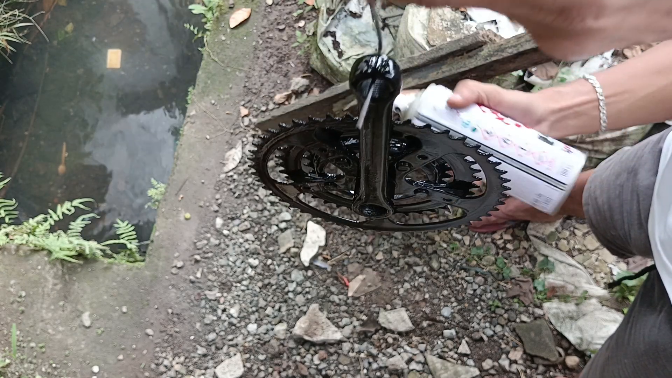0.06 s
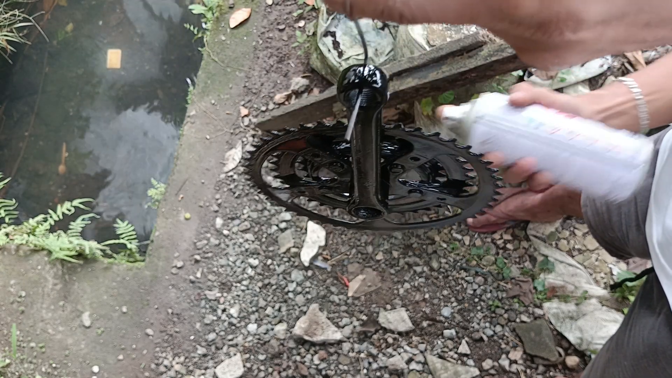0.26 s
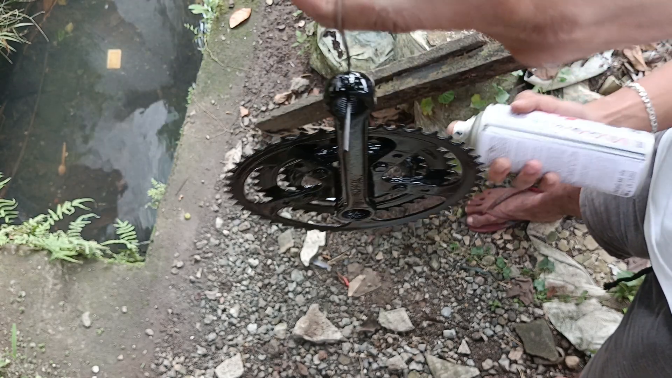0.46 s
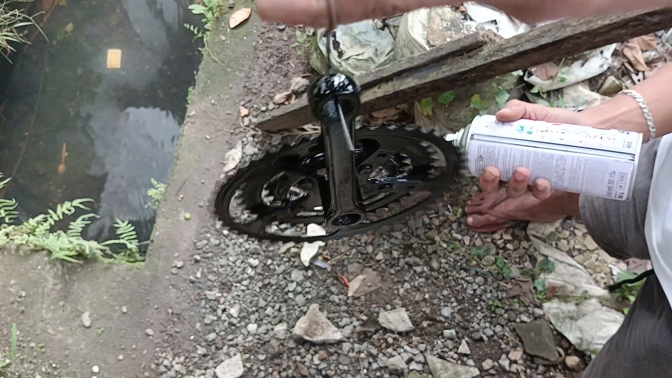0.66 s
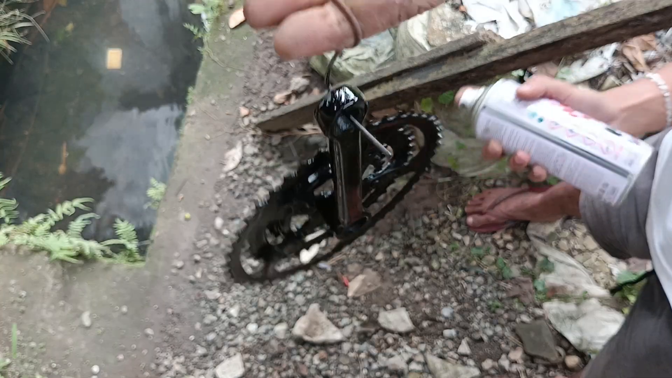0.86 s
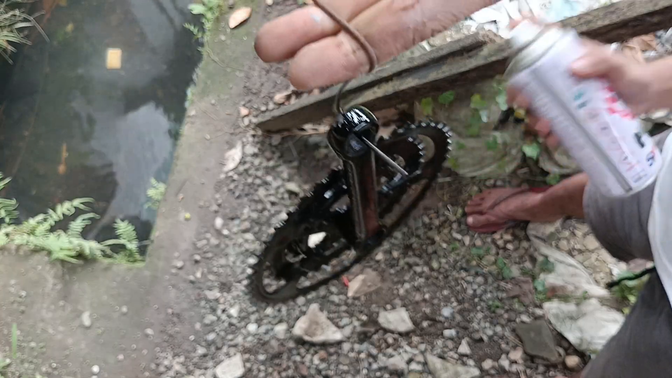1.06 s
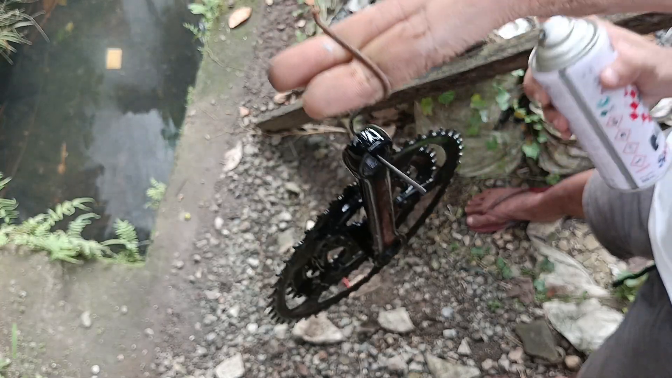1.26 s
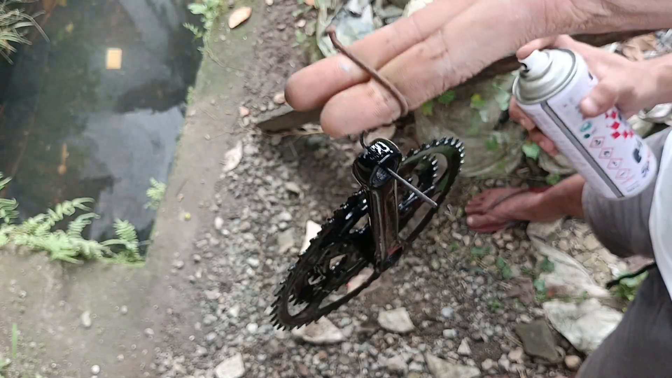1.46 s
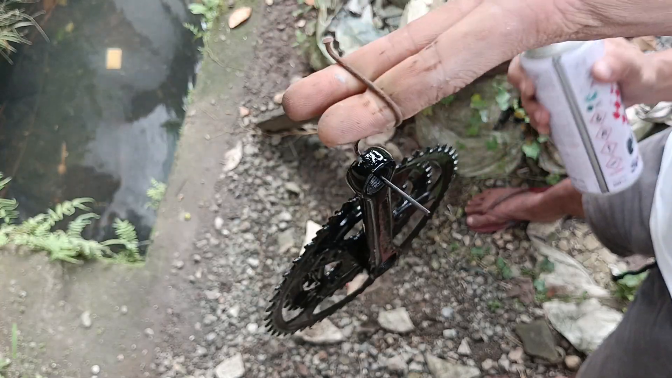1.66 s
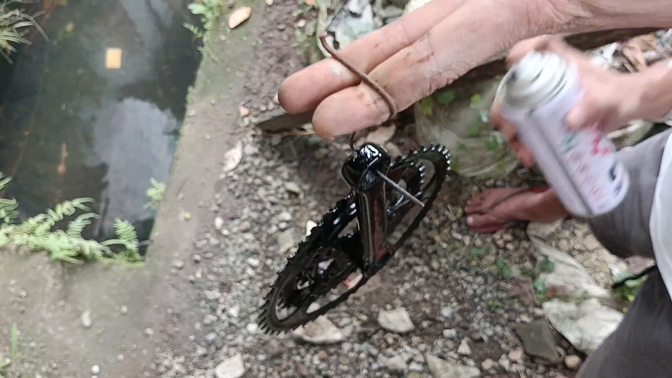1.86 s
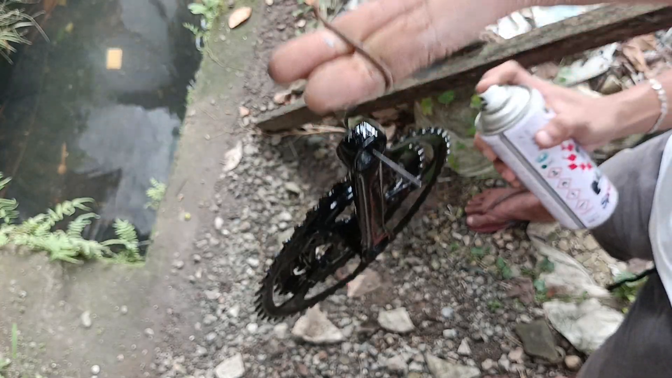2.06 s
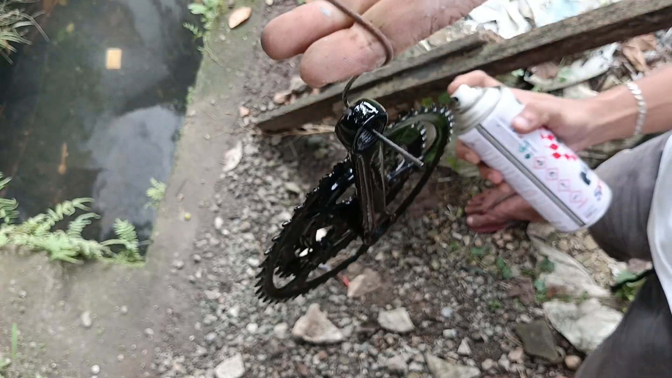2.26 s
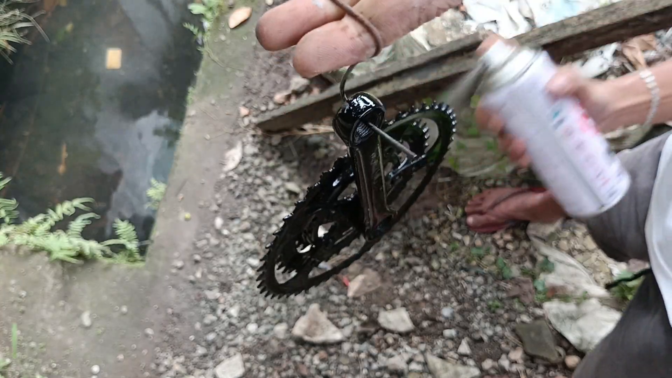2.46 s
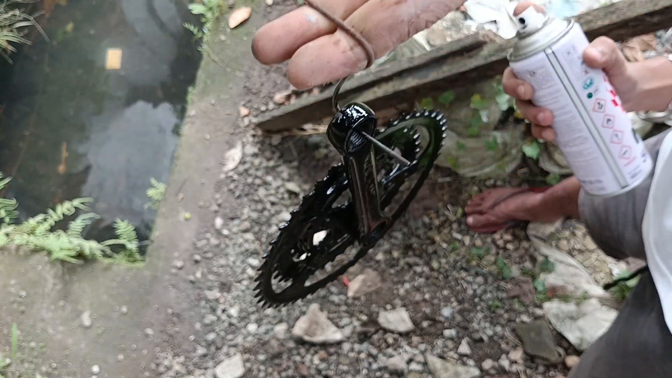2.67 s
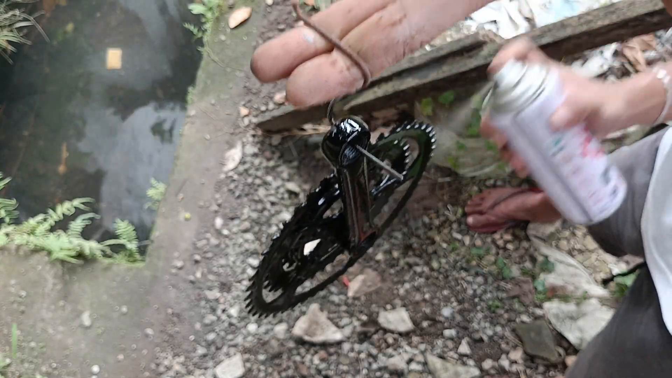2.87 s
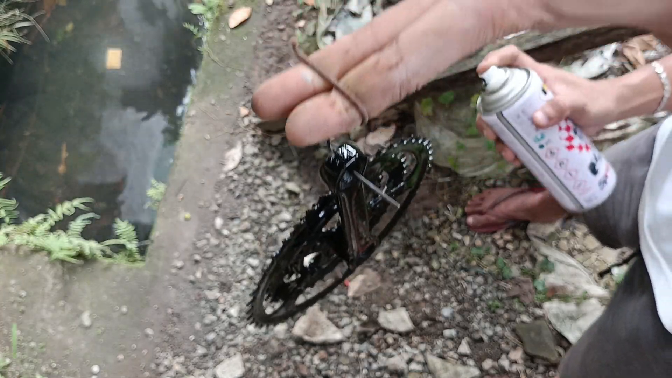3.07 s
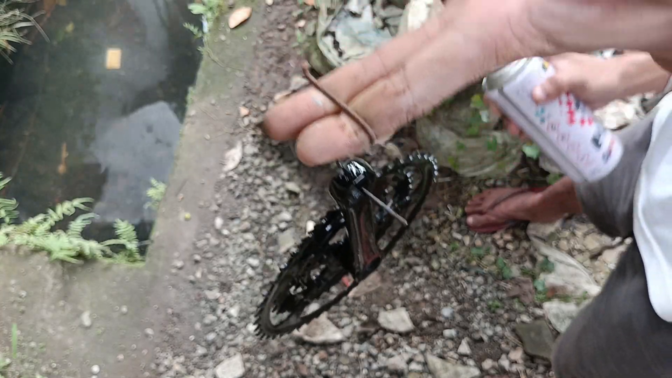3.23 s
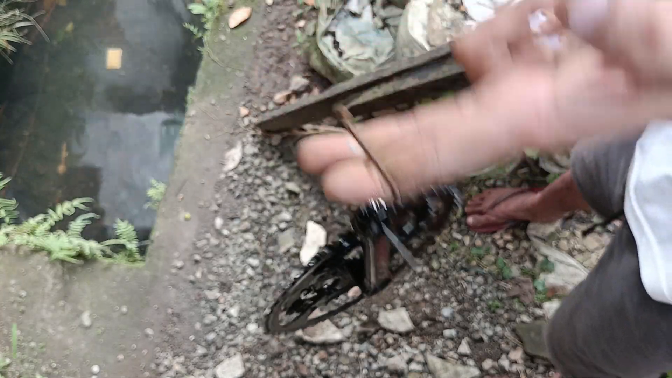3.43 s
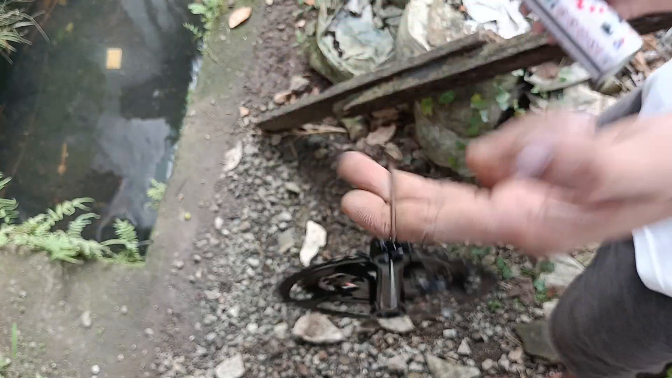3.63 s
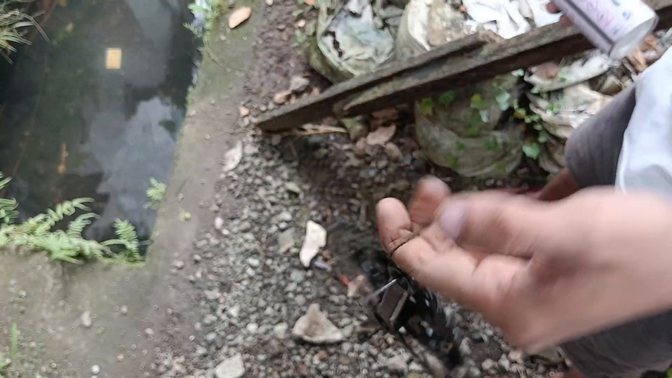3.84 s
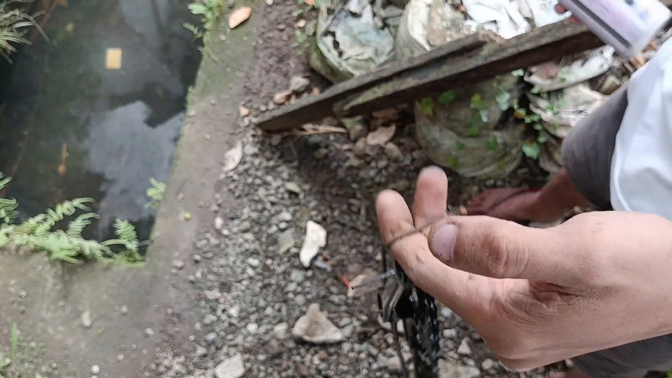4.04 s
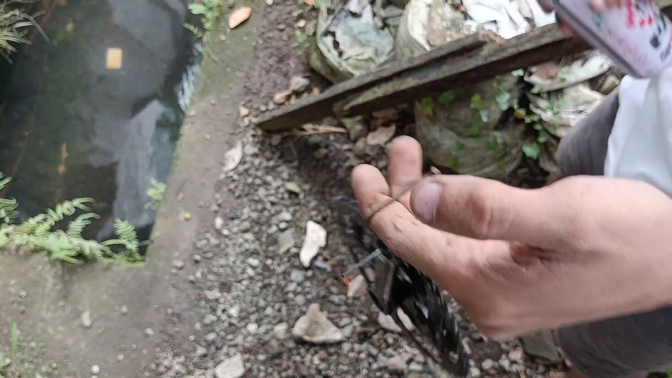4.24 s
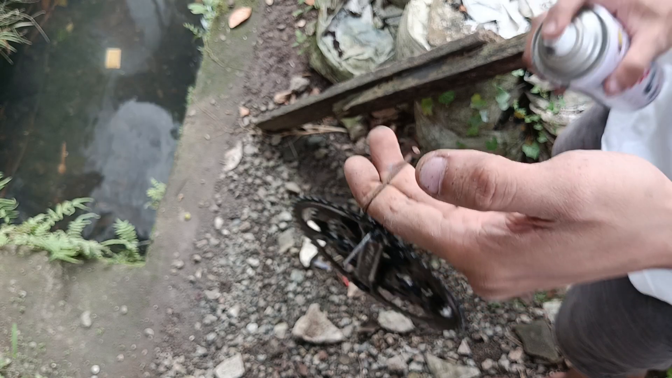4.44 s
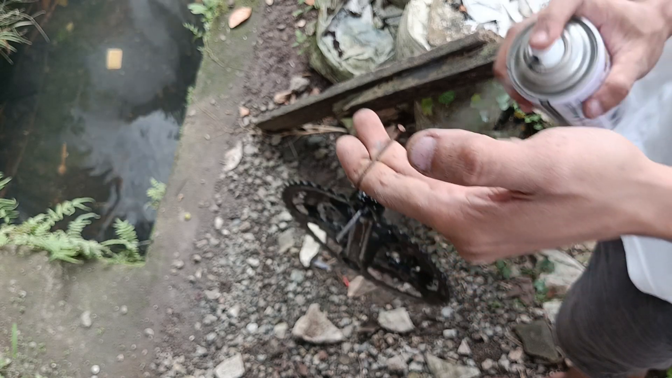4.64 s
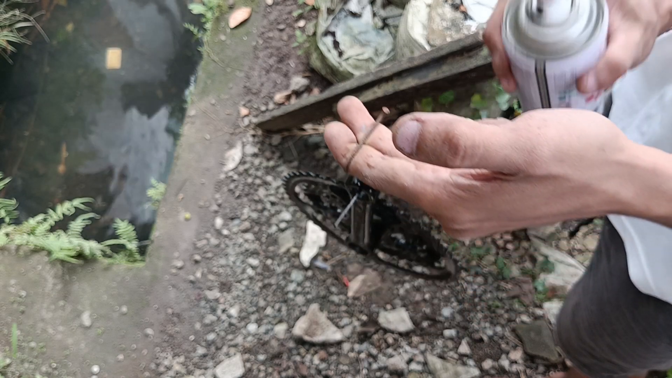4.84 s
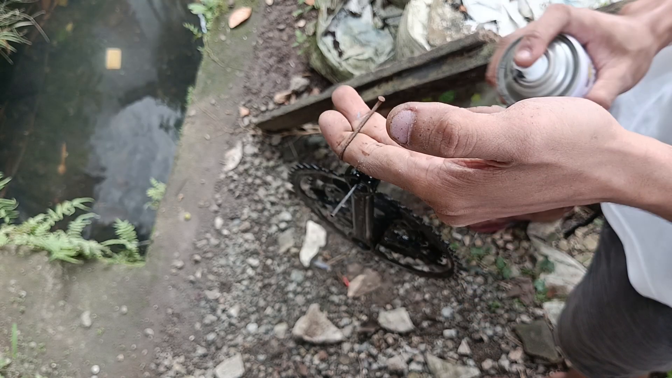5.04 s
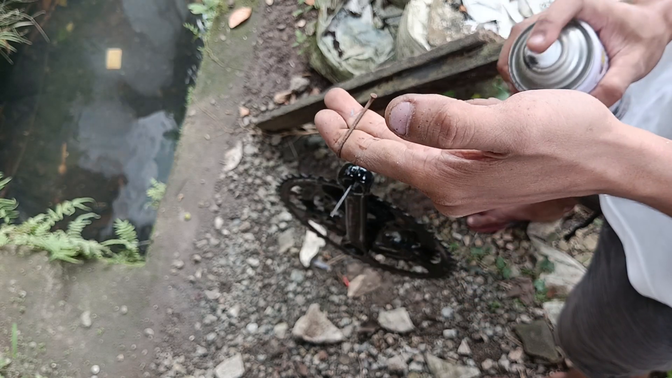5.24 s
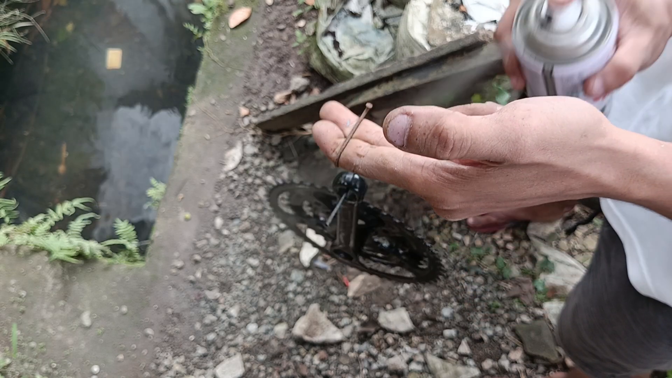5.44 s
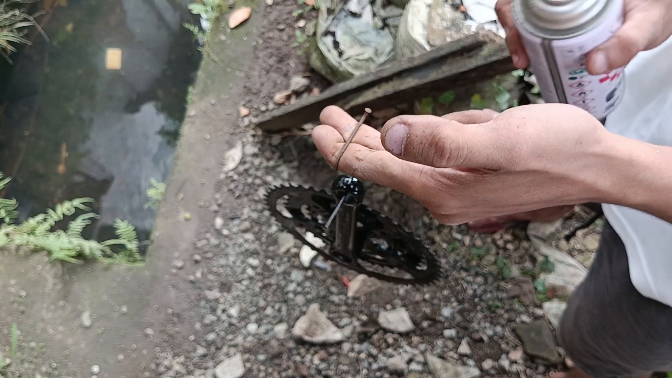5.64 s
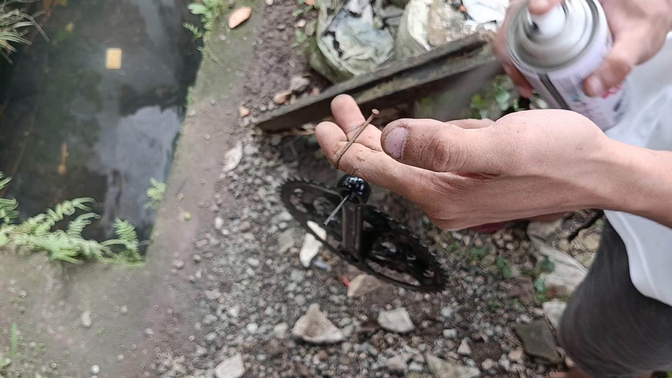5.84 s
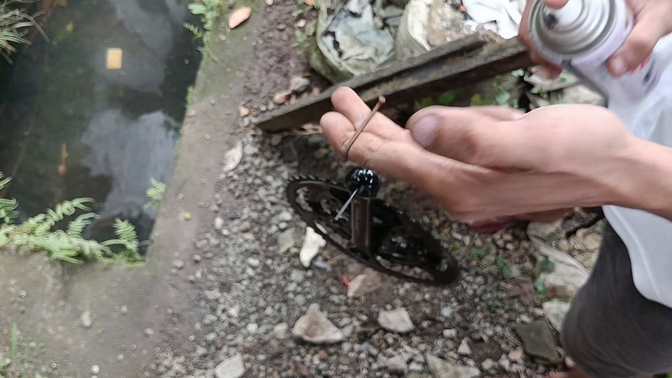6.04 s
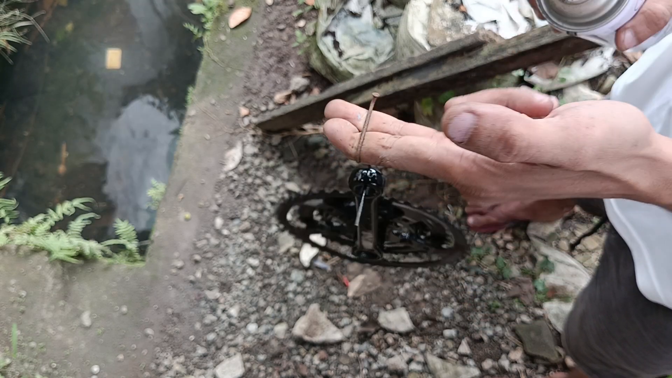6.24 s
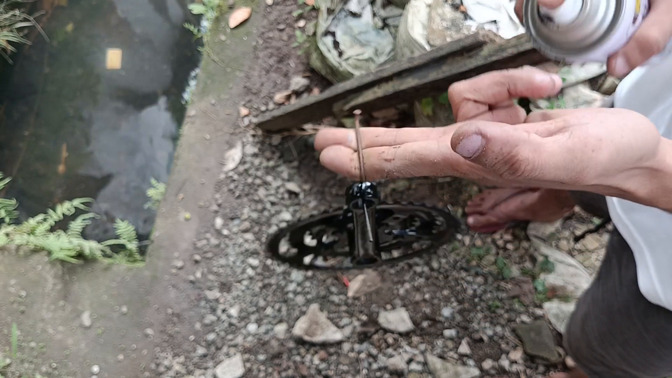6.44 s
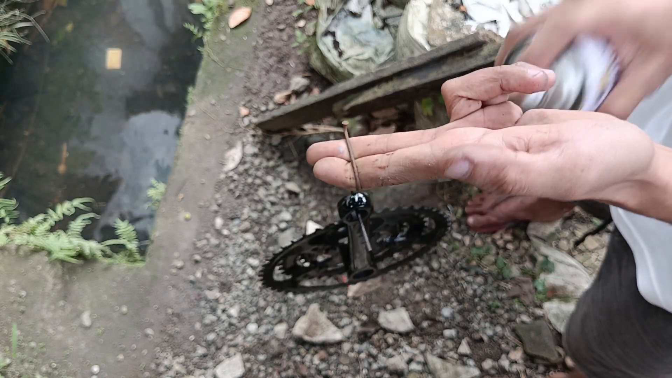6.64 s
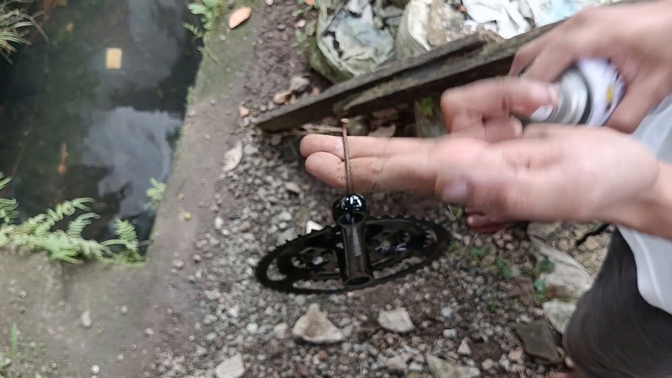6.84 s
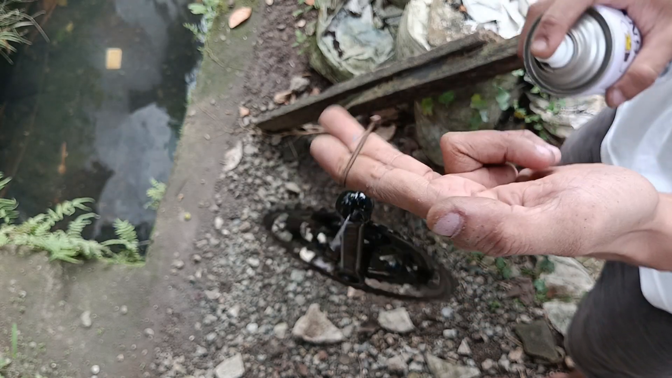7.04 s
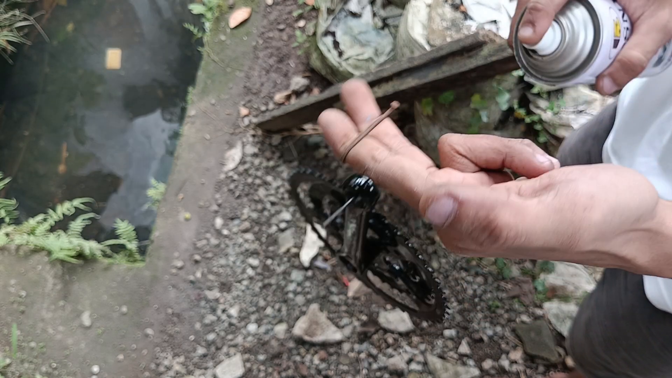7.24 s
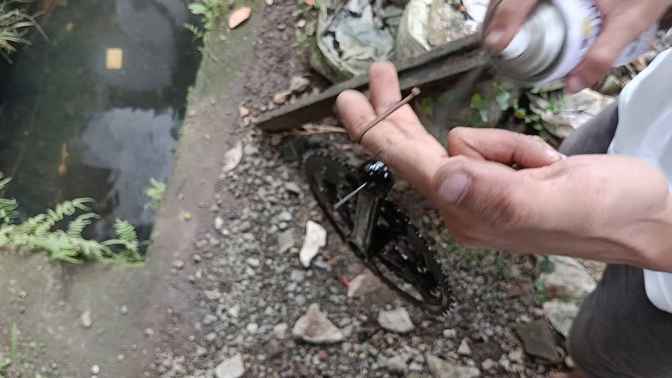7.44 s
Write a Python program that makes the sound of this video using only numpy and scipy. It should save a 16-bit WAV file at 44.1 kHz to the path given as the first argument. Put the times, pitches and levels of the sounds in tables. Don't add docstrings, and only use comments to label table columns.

```python
import sys
import numpy as np
from scipy import signal
from scipy.fft import rfft, irfft
from scipy.io import wavfile
from scipy.ndimage import uniform_filter1d, map_coordinates

SR = 44100
rng = np.random.default_rng(int(sys.argv[2]) if len(sys.argv) > 2 else 0)


def nominal_scale(level):
    x = np.asarray(level, float) / 20
    return 10 ** x


def int16_out(signal):
    q = np.round(np.clip(np.atleast_2d(signal).T, -1, 1) * 32767)
    wavfile.write(sys.argv[1], SR, q.astype(np.int16))


N = 330750
T = np.arange(N) / SR

# [start t/s, length t/s, fine hiss at full flow level/dB,
# full flow at share of length, slowness of the finger]
PRESSES = [(-.09, 0.15, -47, 0.64, 2.1), (0.189, 0.22, -33, 0.85, 1.09), (1.532, 0.23, -34, 0.47, 1.27),
           (1.913, 0.21, -34, 0.78, 1), (2.398, 0.25, -32, 0.47, 1.02), (2.91, 0.23, -32, 0.44, 1.26),
           (3.277, 0.17, -73, 0.099, 1.3), (4.617, 0.22, -32.5, 0.83, 1.16),
           (4.951, 0.26, -33.5, 0.33, 1.11), (5.349, 0.28, -31, 0.49, 1.19), (5.816, 0.22, -31, 0.51, 1.04),
           (6.304, 0.29, -57, 0.11, 2.18), (6.687, 0.24, -36.5, 0.84, 1.2)]
# [low roar at start, at end level/dB re jet, hand echo lag at start, at end t/ms]
NOZZLE_AIM = [(-29, 7, 0.65, 0.92), (-13, -18, 0.89, 0.426), (-17, -7, 0.91, 0.775),
              (-9.5, -18.5, 0.83, 0.83), (-13.5, -15.5, 0.59, 0.73), (-10.5, -17.5, 0.84, 0.78),
              (23.5, 8, 1, 0.86), (-13.5, -9.5, 0.863, 0.71), (-9, -12, 0.904, 0.69),
              (-18.5, -6, 0.72, 0.837), (-14.5, -13, 0.912, 0.7), (17.5, 8.5, 0.95, 0.915),
              (-8, -5.5, 0.897, 0.796)]
WHISTLE_HZ = [2700, 2092, 2700, 2700, 2700, 2689, 2250, 2600, 2600, 2514, 2520, 1893, 1950]
# [f/Hz, level/dB per Hz]
JET_COLOUR = [(290, -60), (500, 8), (799, -21), (872, 10), (1290, -1), (2220, -9), (2540, -4), (3210, -9.5),
              (5120, -1), (11600, -0.5), (15100, 6), (15800, -10), (16900, -27)]
# [t/s, peak level/dB, loudest ring f/Hz, hollow knock level/dB re peak, bright tick level/dB re peak]
FIRST_TILT = [(0.6694, -67, 3680, -4, 0), (0.848, -12.5, 6130, -8, -13.5), (.8495, -15.5, 2930, -19, -42),
              (0.8743, -9, 6100, -15, -11), (0.9, -12.5, 2800, -2.5, -19), (0.9427, -41, 3240, -12, -28),
              (0.9542, -15, 4760, -23, -37), (0.9667, -10, 4700, -12, -24), (0.9819, -21.5, 4430, -7, -25),
              (1.013, -23, 3040, -2, -19), (1.0156, -11, 5180, -26, -13), (1.0428, -28, 5170, 10, -41),
              (1.0979, -31.5, 3100, 0, -21), (1.1058, -27, 6200, -8, -10), (1.1238, -43, 2680, 16, -31),
              (1.149, -52, 4530, 11, -12)]
SECOND_TILT = [(1.3161, -8, 4370, -2.5, -10), (1.3221, -0.5, 6100, -16, -9),
               (1.3232, -13, 4480, -16.5, -14), (1.3255, -11.5, 2870, -5.5, -12),
               (1.331, -20, 6800, -8, -6), (1.3396, -32, 6600, 5, -25), (1.355, -31, 5960, 1, -10),
               (1.379, -48, 2840, 18, -8), (1.3967, -46, 7010, 3, -14), (1.436, -26.5, 3400, 12, -16),
               (1.4972, -32, 4470, 6, -35), (1.502, -15.5, 6540, 3, -11), (1.5249, -24, 4600, -15, -25),
               (1.5403, -28, 4600, 12, -21), (1.5636, -26, 2950, 4, -20), (1.581, -20, 3000, -1, -7),
               (1.5835, -20.5, 4530, -2.5, -8), (1.595, -27, 2700, 1.5, -16), (1.612, -31, 4750, -7, -20),
               (1.6322, -26, 5500, 4, -21), (1.643, -27, 6050, 11, -13), (1.69, -28, 2640, 5, -5),
               (1.713, -37, 2620, 10, -5), (1.762, -30.5, 4770, -4, -23)]
THIRD_TILT = [(4.4143, -22, 2820, -2, -13.5), (4.419, -28, 6740, 1, -12.5), (4.4595, -4.5, 7970, -24, -4),
              (4.4614, -20, 7900, -4, -9), (4.4725, -16.5, 2600, -2, -28), (4.4730, -12.5, 6760, -15.5, -3),
              (4.485, -26, 5500, -20, -2), (4.5174, -27, 5870, 15, -5.5), (4.5675, -12.5, 6040, -1, -5),
              (4.584, -28.5, 5140, 7, -31), (4.6424, -18.5, 2600, -0.5, -9.5),
              (4.655, -39, 6030, 16.5, -18), (4.679, -16, 2600, -1, -12), (4.685, -17.5, 2270, -6.5, -11),
              (4.7351, -18, 6700, -6, -3), (4.7466, -29.5, 2600, 5, -14), (4.7522, -16, 5200, -10, -6.5),
              (4.7635, -34, 4500, -4, -7), (4.7991, -29.5, 5200, -16, -3.5), (4.8094, -24, 5200, 7.5, -22),
              (4.821, -36, 5200, -9.5, -10.5), (4.837, -44.5, 6050, 7.5, -8),
              (4.8636, -19.5, 2560, -19, -19), (4.887, -41, 2660, -3, -23.5), (4.903, -36.5, 3700, 4, -13),
              (4.919, -46, 2440, -2, -27), (4.9512, -42.5, 4984, 8.5, -16), (4.9584, -28, 6130, -5.5, -33)]
KNOCKS = FIRST_TILT + SECOND_TILT + THIRD_TILT
SHELL_HZ = np.array([1250, 1450, 1650, 1850, 2250, 2700, 3150, 3700, 4500, 4800, 5800, 6400, 6800, 7800, 8300, 9300, 10300, 10800, 12600, 13600, 14800])[:, None]
HOLLOW_HZ = (1762, 1580, 1280)
# [t/s, peak level/dB]
SLIPS = [(3.101, -49), (3.136, -48), (3.14, -55), (3.145, -47), (3.151, -43), (3.158, -48), (3.167, -48),
         (3.1705, -57), (3.1752, -38), (3.187, -44), (3.192, -54), (3.204, -57), (3.213, -57), (3.221, -62),
         (4.352, -56), (4.367, -52)]
# [f/Hz, level/dB]
YARD_COLOUR = [(600, -25), (1200, -1.5), (2500, 5), (6000, -0.5), (10000, -1), (16000, -5)]
# [start t/s, length t/s, f/Hz, width f/Hz,
# level/dB]
PUFFS = [(0, .2, 230, 60, -61), (.103, .11, 520, 170, -63), (.11, .24, 387, 175, -59),
         (.3, .2, 478, 124, -65), (.72, .08, 590, 150, -67), (1.317, .04, 590, 240, -59),
         (1.495, .02, 600, 280, -55), (1.53, .2, 630, 200, -58), (1.9, .15, 2400, 3700, -53),
         (2.06, .08, 520, 140, -66), (2.2, .09, 607, 130, -69), (2.564, .068, 540, 520, -56),
         (2.963, .084, 640, 480, -60), (3.165, .02, 1100, 300, -61), (3.345, .045, 580, 240, -66),
         (3.45, .005, 1250, 400, -62), (4.085, .05, 2050, 300, -62), (4.12, .06, 1850, 400, -61),
         (4.335, .025, 4060, 800, -62), (4.415, .09, 880, 260, -57), (4.5, .22, 600, 300, -64),
         (5, .08, 2210, 1300, -60), (5.55, .07, 525, 270, -60), (5.97, .09, 560, 220, -62),
         (6.248, .015, 1890, 330, -55), (6.255, .065, 3600, 5000, -60), (6.41, .07, 800, 260, -62),
         (6.63, .065, 960, 230, -69), (6.822, .07, 483, 310, -54), (6.88, .44, 410, 145, -59),
         (7.1, .2, 230, 60, -61), (7.212, .21, 605, 140, -70), (7.44, .05, 600, 200, -64),
         (7.44, .05, 2600, 1500, -70)]
# [start t/s, length t/s, f/Hz, level/dB]
STREAKS = [(.031, .23, 1213, -59), (.4, .14, 2184, -71), (.43, .077, 1650, -66), (.52, .069, 1430, -63),
           (.548, .4, 2100, -67), (.568, .07, 3400, -71), (.693, .15, 1270, -69), (1.17, .05, 1140, -66),
           (1.434, .01, 882, -62), (1.72, .46, 690, -64), (2.28, .079, 1250, -65), (2.53, .056, 665, -56),
           (2.68, .11, 4100, -78), (3.199, .23, 2100, -68), (3.235, .15, 880, -65), (3.26, .037, 3350, -73),
           (3.402, .004, 4750, -68), (3.4, .07, 1250, -68), (3.43, .11, 3200, -77), (3.47, .12, 2150, -71),
           (3.545, .17, 890, -64), (3.585, .21, 1286, -65), (3.667, .082, 4000, -80), (3.7, .11, 2204, -73),
           (4.04, .2, 1400, -72), (4.325, .03, 1143, -64), (4.31, .05, 3840, -66), (5.24, .096, 1400, -66),
           (5.488, .29, 902, -63), (5.618, .29, 2000, -73), (5.634, .32, 1300, -69),
           (5.643, .39, 1570, -68), (5.66, .15, 3700, -77), (5.76, .1, 2300, -65), (5.9, .1, 950, -64),
           (6.06, .07, 1260, -64), (6.065, .08, 3830, -74), (6.14, .09, 920, -60), (6.143, .06, 3100, -76),
           (6.255, .09, 1250, -65), (6.362, .03, 620, -58), (6.526, .13, 3750, -70), (6.56, .11, 3500, -70),
           (6.647, .036, 4400, -72), (6.94, .28, 1250, -68), (7.1, .15, 1238, -68), (7.2, .082, 2500, -73),
           (7.378, .079, 1300, -67)]
# [start t/s, length t/s, rustle level/dB, dry crackle level/dB]
MOVES = [(0, 0.15, -71, -71), (0.17, 0.26, -63.5, -66), (0.602, 0.7, -70.5, -75.5),
         (1.776, 0.25, -58.5, -73), (2.096, 0.045, -52.5, -62), (2.666, 0.15, -75, -77),
         (3.105, 0.075, -67, -76), (3.4, 0.05, -75, -83), (3.656, 0.045, -79.5, -90),
         (3.783, 0.19, -78, -95), (4.059, .07, -77.5, -76.5), (4.338, 0.12, -71, -75),
         (5.663, 0.17, -85, -97), (6.29, 0.08, -62, -72), (6.55, 0.058, -73, -94), (6.946, 0.08, -71, -76),
         (7.143, 0.49, -82, -99.5)]
# [t/s, level/dB]
LEAVES_LEVEL = [(0, -60), (.55, -64), (1.26, -64), (2.23, -55), (2.36, -77), (2.77, -62), (2.88, -65),
                (3.44, -63.5), (3.55, -68.5), (3.68, -61), (3.99, -79.5), (4.13, -66), (4.27, -74.5),
                (5.7, -68.5), (6.15, -66.5), (6.97, -66), (7.2, -73), (7.5, -66.5)]
# [f/Hz, level/dB per Hz]
INSECT_COLOUR = [(3530, -51), (6000, -28.5), (6550, -24.5), (6680, -7.5), (7370, -3), (9110, 1),
                 (9910, -9.5), (12000, -17), (15600, -48.5), (22000, -120)]
# [t/s, level/dB]
TRAFFIC = [(0, -45), (.6, -47), (1.0, -45.5), (1.8, -52), (2.03, -54), (2.14, -51.5), (3.4, -48),
           (4.3, -52), (4.7, -56.5), (5.6, -48.5), (7.5, -47.5)]
# [f/Hz, level/dB per Hz]
RUMBLE_COLOUR = [(15, -49), (25, -21.5), (38, -35.5), (64, -12.5), (86, -9.5), (112, 1.5), (140, 0),
                 (164, -3.5), (236, -23.5), (260, -30.5), (340, -57.5), (570, -120)]
# [start t/s, length t/s, level/dB]
ENGINE_ON = [(0.195, 0.038, -54.5), (0.304, 0.044, -54), (0.41, 0.098, -47), (0.6, 0.3, -51.5),
             (1.205, 0.1, -49.5), (1.373, 0.06, -52.5), (1.682, 0.058, -50.5), (1.86, 0.066, -50),
             (2.1, 0.06, -55), (2.392, 0.12, -51.5), (2.871, 0.172, -48), (3.192, 0.062, -49),
             (3.331, 0.054, -49.5), (3.564, 0.22, -47.5), (4.127, 0.099, -45), (4.322, 0.13, -50.5),
             (4.633, 0.038, -51.5), (4.784, 0.24, -53), (5.281, 0.076, -49.5), (5.425, 0.106, -48),
             (5.6, 0.15, -48.5), (6.06, 0.16, -50.5), (6.472, 0.28, -49.5), (7.05, 0.099, -55),
             (7.365, 0.12, -52)]
# [start t/s, length t/s, level/dB]
DRONE_ON = [(0, 0.3, -51.5), (0.407, 1.06, -56.5), (1.574, 0.15, -54.5), (1.974, 0.13, -60),
            (2.292, 0.056, -60), (2.605, 0.64, -58), (4.379, 0.091, -59), (4.794, 0.026, -56.5),
            (5.14, 0.49, -60.5), (5.969, 0.034, -58), (6.094, 0.02, -57.5), (6.256, 0.026, -60),
            (6.345, 0.26, -59.5), (6.75, 1, -52.5)]
# [f/Hz, level/dB per Hz]
DRONE_COLOUR = [(240, -22.5), (290, -5.5), (319, 2.5), (350, -3.5), (390, -11), (450, -26), (520, -25.5)]

WHISTLE_WIDTH_HZ, WHISTLE_DB = 200, 6.5
WEAK_HUSH = 2.5
MID_DB, MID_FOLLOWS_ROAR = -1, 0.28
HAND_ECHO = 0.33
CRACK_S, OPEN_S, EASE_S, CLOSE_S = 0.0063, 0.035, 0.044, 0.03
OPENING_DB, CLOSING_DB = (-51, -13.5, -4), (-3, -3.5, -37.5)
SHELL_T60_S, STRONG_RING_S = 0.011, 0.0011
HOLLOW_DB_PER_OCTAVE = 16.5
SOFT_RISE_S, RISE_DB_PER_DB = 0.00033, 0.73
WASH_FOLLOWS = 0.52
WASH_T60_S, BRIGHT_T60_S = 0.23, 0.1
KNOCK_WET_DB, JET_WET_DB, YARD_T60_S = -23.5, -11, 0.14
WIRE_HZ, WIRE_RING_S = (4000, 4750), 0.001
STREAK_WIDTH_HZ = 105
INSECTS_DB, HISS_DB = -74.5, -77.5
ENGINE_HZ, ENGINE_WIDTH_HZ = 82.5, 8.3
TOP_HZ = 15750


def spray():
    s, jet_db = valve()
    ends = np.ravel([(p[0], p[0] + p[1]) for p in PRESSES])
    roar_ends, lag_ends = np.split(np.array(NOZZLE_AIM), [2], axis=1)
    low_db = np.interp(T, ends, roar_ends.ravel())
    lag_ms = np.interp(T, ends, lag_ends.ravel())
    weak_db = np.maximum(low_db, 0)
    mid_db = MID_DB + MID_FOLLOWS_ROAR * low_db + 0.25 * weak_db
    pressed = sum((T >= a) & (T < b) for a, b in ends.reshape(-1, 2))
    last_press = np.maximum(np.searchsorted(ends[::2], T) - 1, 0)
    since = 0.0031 + T - ends[::2][last_press]

    gas = colour(patchy(2.35, size=256, hold_s=0.033), JET_COLOUR)
    whistle = slow_noise(WHISTLE_WIDTH_HZ / 2)
    whistle_hz = np.interp(T, ends, np.repeat(WHISTLE_HZ, 2))
    whistle = level(whistle * np.sin(2 * np.pi * np.cumsum(whistle_hz) / SR), WHISTLE_DB)
    low = level(band(band(gas, 1403, 3440), 1060, 6100), 0)
    low = low + np.exp(-since / 0.073) * whistle * nominal_scale(-WEAK_HUSH * weak_db)
    low = low * nominal_scale(low_db) * np.clip((since - 0.014) / 0.012, 0, 1)
    mid = level(band(gas, 3760, 9900), 0) * nominal_scale(mid_db)
    fine = level(band(gas, 9600, 15860), 0)
    jet = (fine + mid + low) * nominal_scale(np.interp(T, s, jet_db))
    jet = jet * uniform_filter1d(1.0 * pressed, size=200)
    late = np.arange(N) - lag_ms * SR / 1000
    echo = map_coordinates(jet, [late], order=3)
    jet = (jet + HAND_ECHO * echo) / np.sqrt(1 + HAND_ECHO ** 2)
    return jet + yard(jet, JET_WET_DB)


def valve():
    s, length, db, share, slow = np.transpose(PRESSES)
    opening, closing = np.minimum(slow, 1.2), slow ** 2
    end = s + length
    times = [s, s + opening * CRACK_S, s + opening * OPEN_S, s + share * length,
             end - closing * EASE_S, end - closing * CLOSE_S, end]
    levels = db[:, None] + np.r_[OPENING_DB, 0, CLOSING_DB]
    return np.sort(times, axis=0).T.ravel(), levels.ravel()


def ball():
    out, t = np.zeros(N + 8192), T[:8192]
    short = t[:2048]
    t60 = SHELL_T60_S * (3000 / SHELL_HZ) ** 0.13
    bright = np.clip(np.log2(SHELL_HZ / 6500) / 0.7, 0, 1)
    in_air = SHELL_HZ < 1900
    chance = rng.standard_normal((len(KNOCKS), 3, len(SHELL_HZ), 1))
    noise = rng.standard_normal((len(KNOCKS), len(t)))
    for knock, (size, detune, turn), crack in zip(KNOCKS, chance, noise):
        s, peak_db, ring_hz, knock_db, tick_db = knock
        tilt = sum(int(s > later[0][0] - 0.01) for later in (SECOND_TILT, THIRD_TILT))
        hollow_hz = HOLLOW_HZ[tilt]
        near_db = -7 * np.abs(np.log2(SHELL_HZ / ring_hz))
        hollow_db = knock_db + 2.5 - HOLLOW_DB_PER_OCTAVE * np.abs(np.log2(SHELL_HZ / hollow_hz))
        steel_db = bright * (tick_db - 6.0) + (1 - bright) * (near_db - 8.5)
        share_db = np.where(in_air, hollow_db, steel_db) + 3.5 * size
        phase = 2 * np.pi * SHELL_HZ * (1 + 0.017 * detune) * short + 0.78 * turn
        rings = nominal_scale(share_db - 60 * short / t60) * np.sin(phase)
        rings = rings[SHELL_HZ[:, 0] > 1900].sum(axis=0)

        strong = np.sin(2 * np.pi * ring_hz * t) * np.exp(-t / STRONG_RING_S)
        tick = nominal_scale(tick_db + 11.0) * band(crack, 4800, 12500) * np.exp(-t / 0.0004)
        air = np.sin(2 * np.pi * hollow_hz * (1 + 0.11 * detune[0]) * t) * t / 0.0012 * np.exp(-t / 0.001)
        air = nominal_scale(knock_db + 1.5) * air
        rise_s = SOFT_RISE_S * nominal_scale(-RISE_DB_PER_DB * (peak_db + 6.5))
        hit = np.pad(rings, (0, len(t) - 2048)) + strong + tick + air
        hit = hit * np.minimum(t / rise_s, 1)

        shade_db = (0.8 * share_db - 3.2 * in_air)[:, 0]
        shade = [(700, -38.5)] + list(zip(SHELL_HZ[:, 0], shade_db)) + [(17500, 0.51 * tick_db - 10.5)]
        wash = level(colour(crack, shade), KNOCK_WET_DB - (1 - WASH_FOLLOWS) * (peak_db + 16.5))
        dull = signal.lfilter([0.45], [1, -0.55], wash)
        tail = dull * nominal_scale(-60 * t / WASH_T60_S) + (wash - dull) * nominal_scale(-60 * t / BRIGHT_T60_S)
        tail = tail + 2.43 * wash * np.exp(-t / 0.0047)
        i = int(s * SR)
        out[i:i + len(t)] += nominal_scale(peak_db) * (hit / np.abs(hit).max() + tail)
    return band(band(out[:N], 900, 17000), 860, 19000)


def scrape():
    out, t = np.zeros(N), T[:512]
    chance = rng.standard_normal((len(SLIPS), 2))
    swell = t / WIRE_RING_S * np.exp(-t / WIRE_RING_S)
    for (s, db), share in zip(SLIPS, chance):
        ring = sum(nominal_scale(3 * c + 1.5) * np.sin(2 * np.pi * hz * t) for hz, c in zip(WIRE_HZ, share))
        out[int(s * SR):][:len(t)] += nominal_scale(db) * ring * swell
    return out


def yard(x, wet_db):
    t = T[:SR // 4]
    tail = colour(rng.standard_normal(len(t)), YARD_COLOUR)
    tail = tail * nominal_scale(-60 * t / YARD_T60_S) * np.minimum(t / 0.0041, 1)
    return signal.fftconvolve(x, tail * nominal_scale(wet_db) / np.sqrt(np.sum(tail ** 2)))[:N]


def streaks():
    out = np.zeros(N)
    rows = [(s, length, hz, STREAK_WIDTH_HZ * (hz / 1000) ** 0.45, db) for s, length, hz, db in STREAKS]
    rows = rows + PUFFS
    noise = rng.standard_normal((len(rows), SR // 2))
    for (s, length, hz, width_hz, db), x in zip(rows, noise):
        i, n = int(max(s - 0.01, 0) * SR), int((length + 0.037) * SR)
        streak = level(band(x, hz - width_hz / 3, hz + width_hz / 3)[-n:], db)
        out[i:i + n] += (streak * signal.windows.tukey(n, 0.65))[:N - i]
    return out


def garden():
    s, length, rustle_db, crackle_db = np.transpose(MOVES)
    patches = patchy(6.5, size=1024, hold_s=0.07)
    leaves = level(band(band(patches, 1080, 4000), 1138, 2400), 0)
    leaves = leaves * nominal_scale(np.interp(T, *np.transpose(LEAVES_LEVEL)))
    cloth = level(band(patches, 2300, 5400), 0) * gate(s, length, rustle_db, 190, 160, -87)
    flakes = band(patchy(3.0, size=32, hold_s=0.014), 10500, 15500)
    flakes = level(flakes, 0) * gate(s, length, crackle_db, 150, 200, -99)
    insects = colour(patchy(4, size=512, hold_s=0.1), INSECT_COLOUR)
    insects = level(band(insects, 4900, 13000), INSECTS_DB)
    hiss = level(band(patchy(5, size=512, hold_s=0.05), 200, 1600), HISS_DB)
    return leaves + cloth + flakes + insects + hiss


def far():
    rumble = level(colour(patchy(4, size=2048, hold_s=0.06), RUMBLE_COLOUR), 0)
    rumble = rumble * nominal_scale(np.interp(T, *np.transpose(TRAFFIC)))
    drone = level(colour(patchy(1.2, size=2048, hold_s=0.098), DRONE_COLOUR), 0)
    drone = drone * gate(*np.transpose(DRONE_ON), 326, 210, -83)
    engine_hz = ENGINE_HZ + ENGINE_WIDTH_HZ / 2 * level(slow_noise(3), 0)
    engine = np.sqrt(2) * np.sin(2 * np.pi * np.cumsum(engine_hz) / SR)
    engine = engine * gate(*np.transpose(ENGINE_ON), 300, 200, -93)
    return rumble + engine + drone


def patchy(depth_db, size, hold_s):
    cells = signal.stft(rng.standard_normal(N), nperseg=size)[2]
    frames = max(hold_s * SR * 2 / size, 1.0)
    at = np.indices(cells.shape) / np.array([2, frames])[:, None, None]
    slow = map_coordinates(rng.standard_normal(cells.shape), at, order=1)
    return signal.istft(cells * nominal_scale(depth_db * slow / slow.std()), nperseg=size)[1][:N]


def gate(starts, lengths, db, rise_db_s, fall_db_s, shut_db):
    gain_db = np.full(N, 1.0 * shut_db)
    for s, length, top_db in zip(starts, lengths, db):
        outside_db = np.maximum(rise_db_s * (s - T), fall_db_s * (T - s - length))
        gain_db = np.maximum(gain_db, top_db - np.maximum(0, outside_db))
    return nominal_scale(gain_db)


def slow_noise(top_hz):
    return signal.sosfilt(signal.butter(2, top_hz, fs=SR, output="sos"), rng.standard_normal(N))


def level(x, db):
    return x * nominal_scale(db) / np.sqrt(np.mean(x ** 2))


def colour(x, points):
    hz, db = np.transpose(points)
    at = np.fft.rfftfreq(len(x), 1 / SR) + 1
    gain_db = np.interp(np.log(at), np.log(hz), db, left=-90, right=-90)
    return irfft(rfft(x) * nominal_scale(gain_db), len(x))


def band(x, low_hz, high_hz):
    return signal.sosfilt(signal.butter(3, [low_hz, high_hz], "band", fs=SR, output="sos"), x)


def scene():
    edges = np.minimum(np.minimum(T, T[::-1]) / 0.006, 1)
    mix = spray() + ball() + scrape() + streaks() + garden() + far()
    return np.tile(mix * edges, (2, 1))


def band_limit(x):
    return signal.sosfilt(signal.butter(12, 17000, fs=SR, output="sos"), x)


def record(dry):
    cut = signal.sosfilt(signal.ellip(8, 0.2, 28, TOP_HZ, fs=SR, output="sos"), dry)
    mix = np.clip(cut, -1, 1)
    return band_limit(mix)


dry = scene()
out = record(dry)
int16_out(out)
```